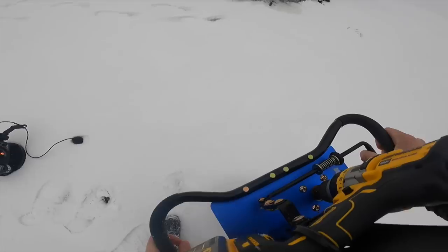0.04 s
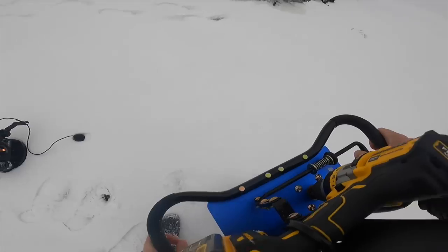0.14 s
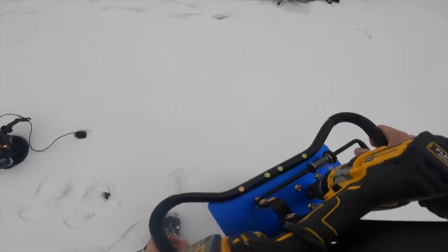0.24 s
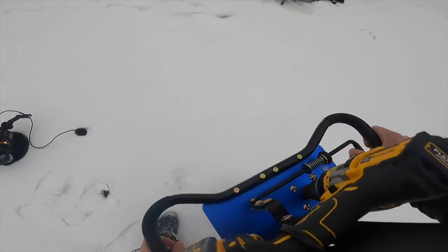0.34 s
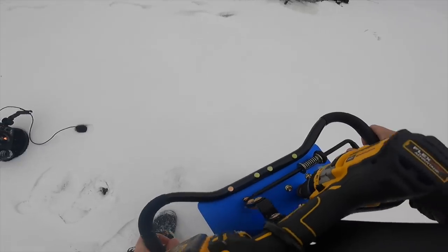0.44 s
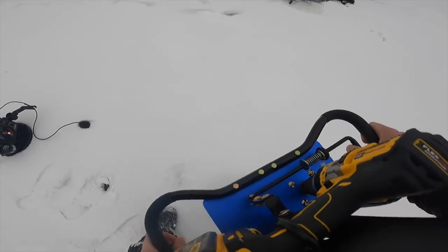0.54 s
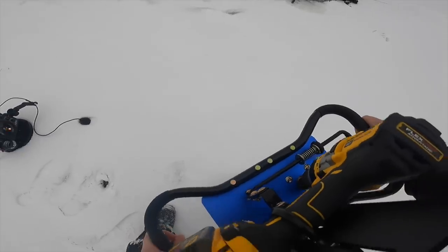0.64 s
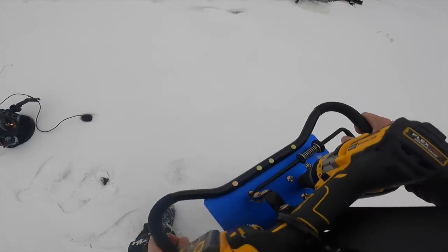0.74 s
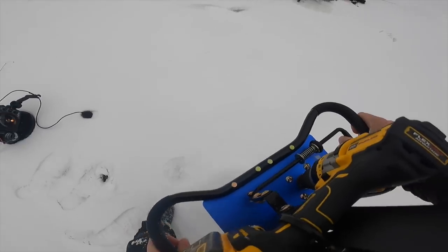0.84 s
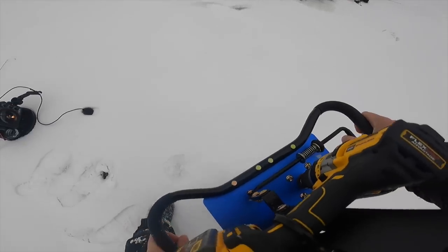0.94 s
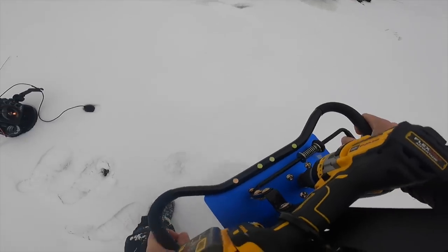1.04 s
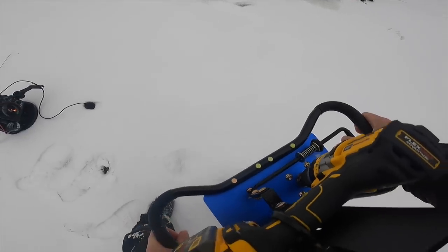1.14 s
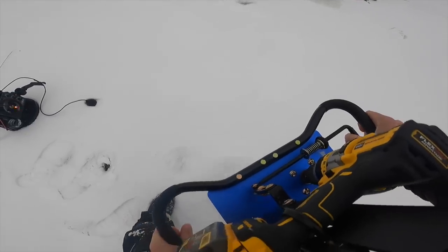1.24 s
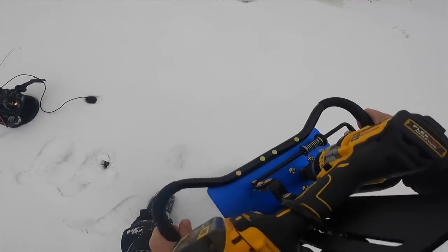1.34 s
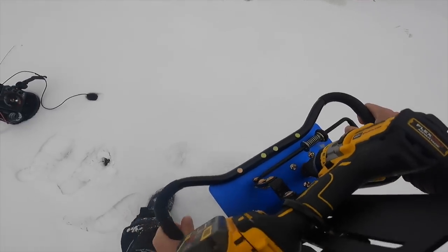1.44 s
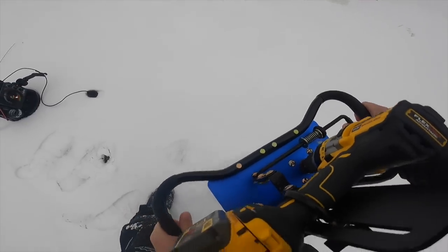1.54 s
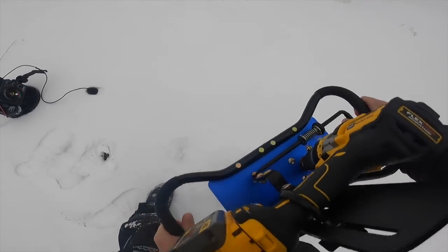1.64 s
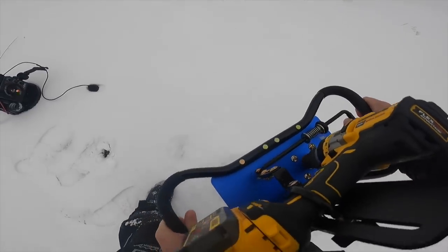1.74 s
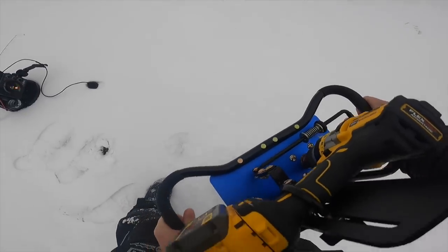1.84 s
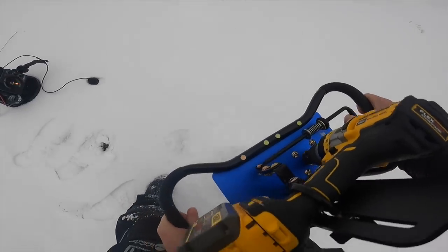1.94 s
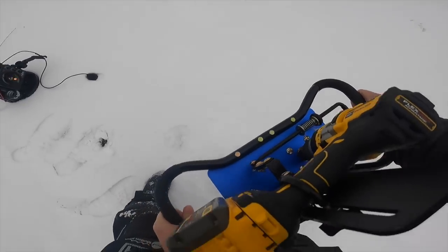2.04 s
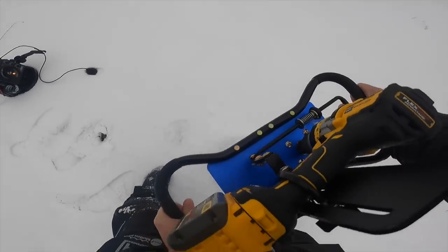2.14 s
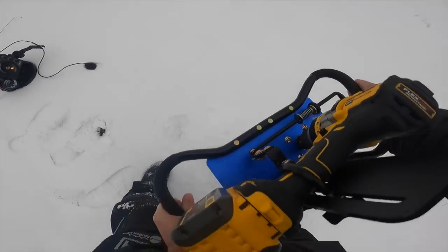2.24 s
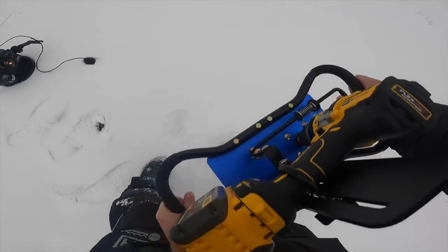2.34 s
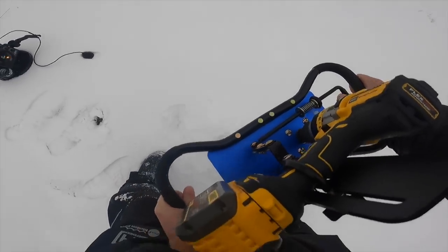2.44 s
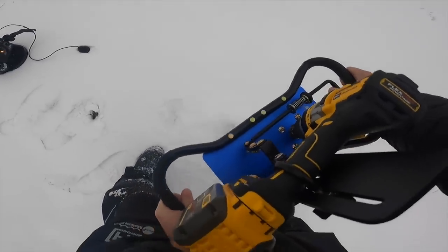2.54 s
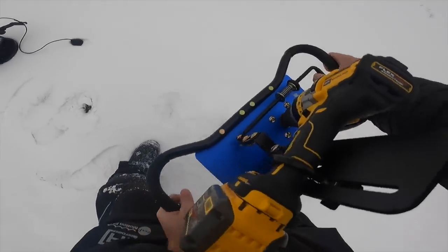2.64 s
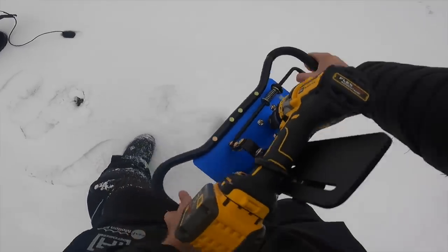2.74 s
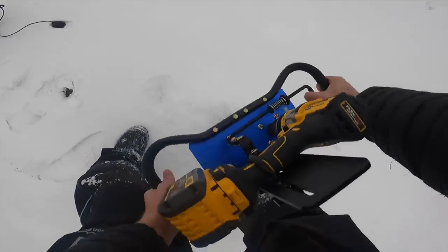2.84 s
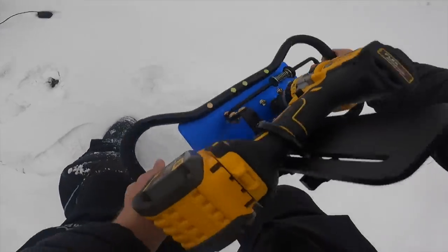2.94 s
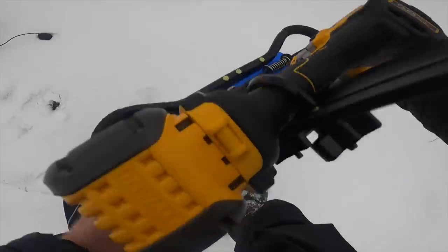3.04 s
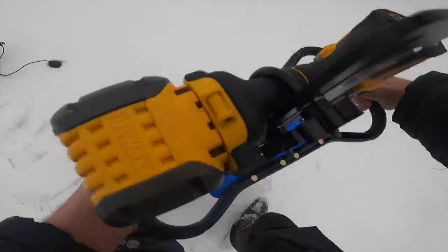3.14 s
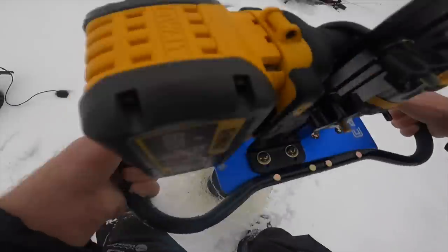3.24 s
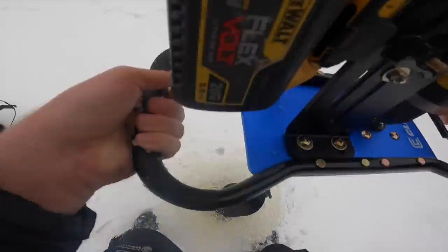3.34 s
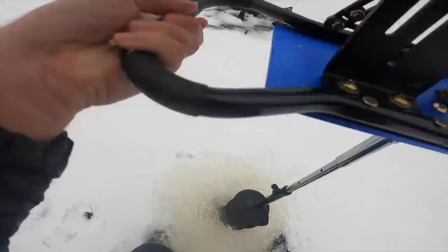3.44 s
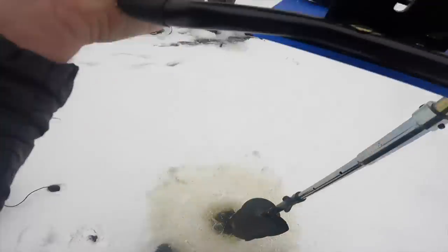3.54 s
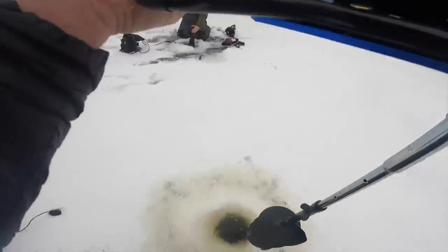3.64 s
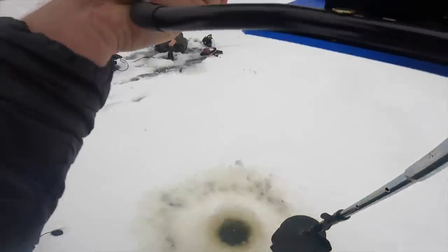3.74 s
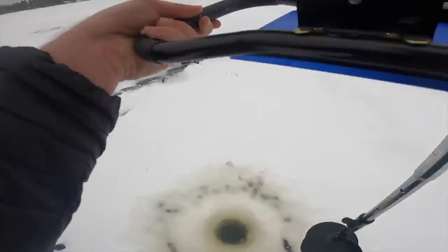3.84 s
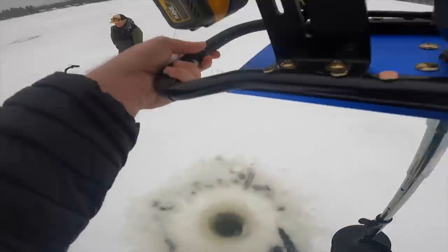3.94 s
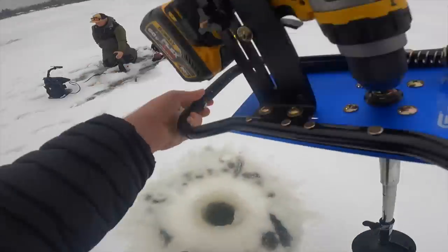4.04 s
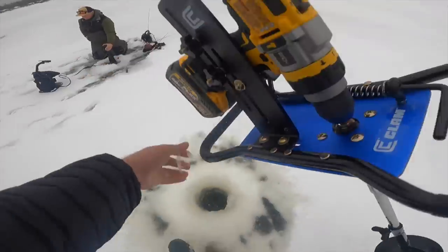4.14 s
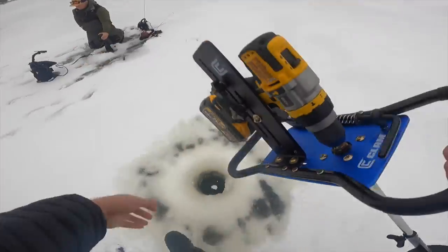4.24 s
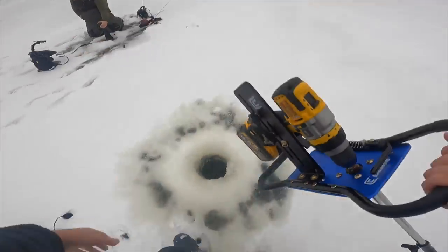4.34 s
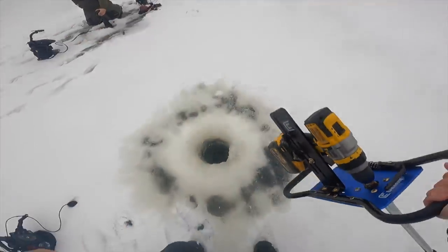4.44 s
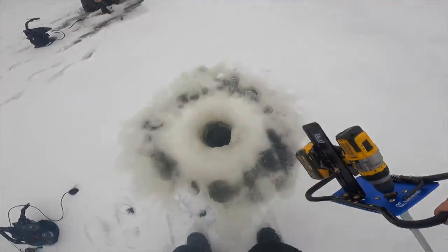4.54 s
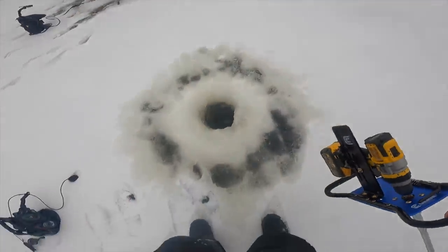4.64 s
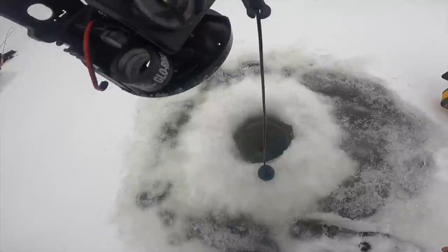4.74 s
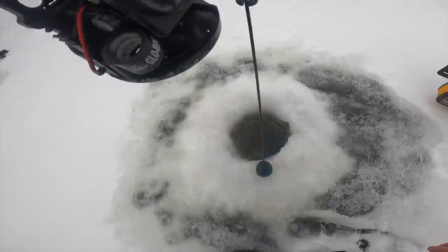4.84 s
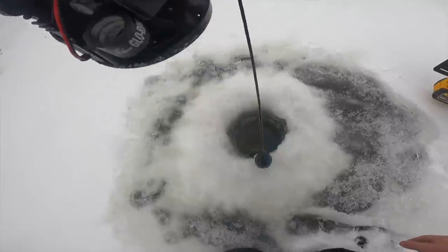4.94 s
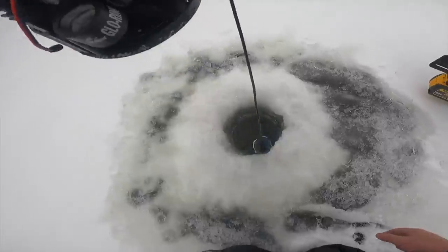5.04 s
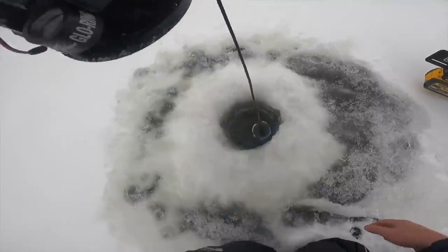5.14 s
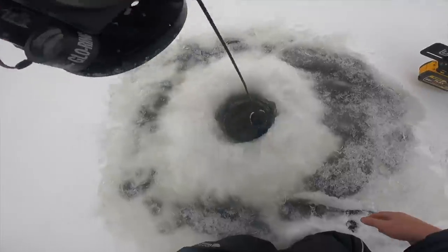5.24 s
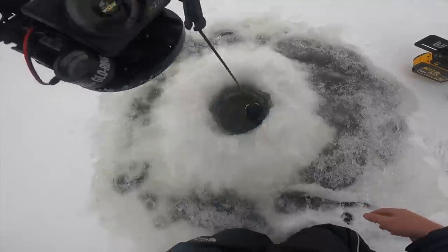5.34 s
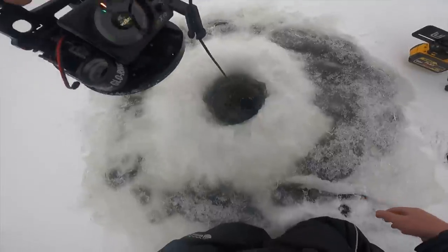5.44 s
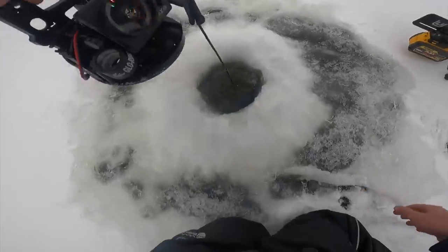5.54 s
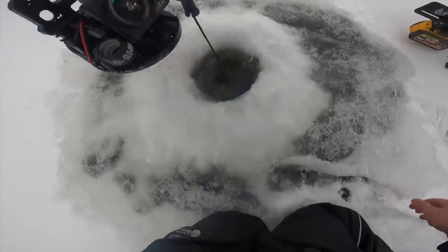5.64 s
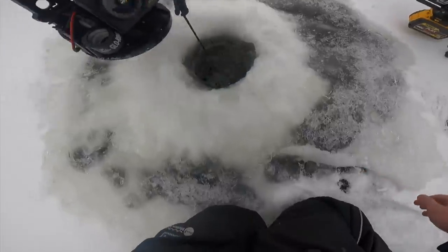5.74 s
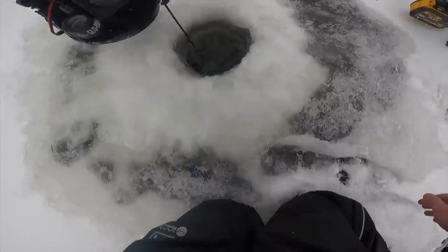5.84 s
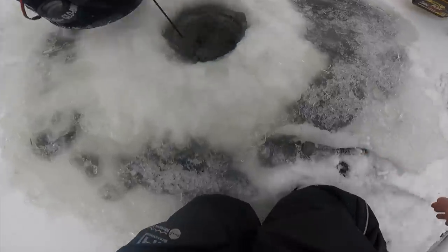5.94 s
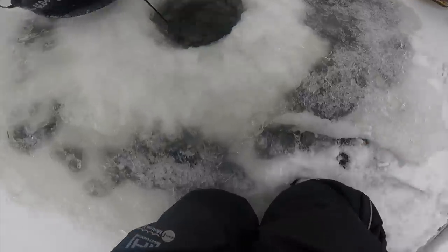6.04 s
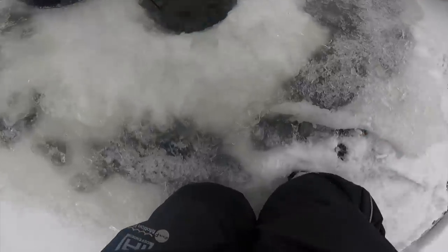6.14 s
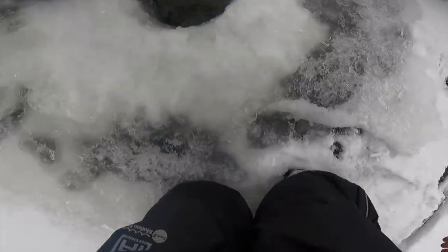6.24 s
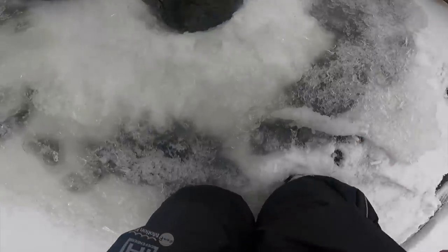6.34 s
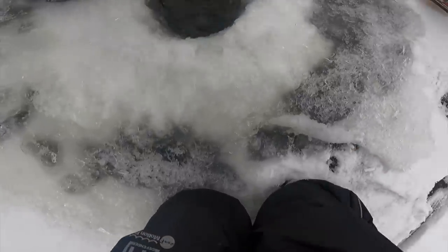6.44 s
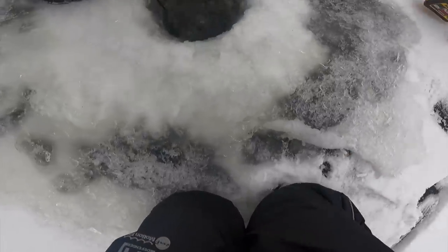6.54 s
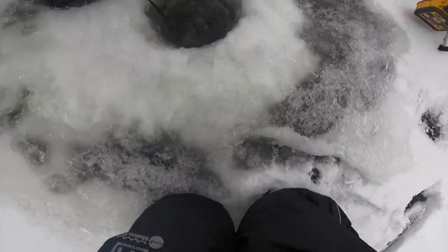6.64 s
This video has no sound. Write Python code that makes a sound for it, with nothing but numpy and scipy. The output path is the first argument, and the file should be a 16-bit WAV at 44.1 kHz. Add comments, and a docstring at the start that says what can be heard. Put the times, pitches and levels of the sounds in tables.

```python
"""Lake ice, light wind: a cordless drill turns an auger close by, as wavering gear orders over shaped noise.
It breaks through, races unloaded while the hole gulps in rough low tones, and stops with a falling whine.
Slush drains and crunches as noise, the frame is laid down with a clatter of decaying modes, the floor drops
abruptly, then a depth sounder's float plops in as rising tones, its transducer ticking and its display
motor humming."""
import sys
import numpy as np
from scipy import signal
from scipy.fft import rfft, irfft, next_fast_len
from scipy.io import wavfile
from scipy.ndimage import uniform_filter1d, map_coordinates

SR = 44100
rng = np.random.default_rng(int(sys.argv[2]) if len(sys.argv) > 2 else 0)


def dump(signal):
    """Clip the signal to [-1, 1] and save it as 16-bit WAV at the path in sys.argv[1]."""
    limited = np.clip(np.atleast_2d(signal).T, -1, 1)
    pcm = np.round(limited * 32767).astype(np.int16)
    wavfile.write(sys.argv[1], SR, pcm)


N = 295029
TIME = np.arange(N) / SR
HALF = np.array([[.5], [-.5]])  # splits a left-right difference over the two ports


def amp(db):
    """dB to gain."""
    return 10 ** (np.asarray(db) / 20)


def unit(x):
    """Scaled to rms 1."""
    return x / np.sqrt(np.mean(x ** 2) + 1e-20)


def along(points, hz):
    """(Hz, value) points interpolated on a log frequency axis."""
    f, v = np.transpose(points)
    return np.interp(np.log(hz + 1), np.log(f + 1), v)


def colour(points):
    """Gain of frequency from (Hz, dB) points."""
    return lambda hz: amp(along(points, hz))


def curves(rows):
    """One value per sample for each column after the time."""
    s, *cols = np.transpose(rows)
    return [np.interp(TIME, s, c) for c in cols]


def gate(rows):
    """1 while a table lasts, with a short fade outside it."""
    return np.clip(np.minimum(TIME - rows[0][0], rows[-1][0] - TIME) / 0.022 + 1, 0, 1)


def after(start_s, rise_s):
    """0 before start_s, 1 once rise_s has passed."""
    return np.clip((TIME - start_s) / rise_s, 0, 1)


def wobble(rate_hz):
    """A smooth random curve, rate_hz knots a second."""
    return map_coordinates(rng.standard_normal(int(N * rate_hz / SR) + 4), [TIME * rate_hz])


def filtered(x, response):
    """x times a complex response of frequency."""
    m = next_fast_len(N + SR // 2)
    return irfft(rfft(x, m) * response(np.fft.rfftfreq(m, 1 / SR)), m)[..., :N]


def rush(gain, alike, patchy_db, grit_db):
    """Stereo noise of rms 1, with patches of random gain and millisecond grit."""
    gritty = rng.standard_normal((2, N)) * amp(grit_db * wobble(500))
    z = signal.stft(gritty, nperseg=512)[2]
    field = uniform_filter1d(rng.standard_normal(z.shape[1:]), size=5, axis=0)
    field = uniform_filter1d(field, size=8, axis=1)
    pair = signal.istft(z * amp(patchy_db * unit(field)), nperseg=512)[1][:, :N]

    def mid_side(hz):
        turn = np.arccos(np.clip(along(alike, hz), -1, 1)) / 2
        return gain(hz) * [np.cos(turn), np.sin(turn)]

    mid, side = filtered(pair, mid_side)
    return unit(np.array([mid + side, mid - side]))


def burst(count, hz, thud_db, sharp):
    """Noise around a pitch over a dull thud."""
    f = np.fft.rfftfreq(count, 1 / SR) + 1
    snap_gain = 1 / (1 + (sharp * np.log(f / hz)) ** 2)
    thud_gain = 1 / (1 + (0.86 * np.log(f / 400)) ** 4)
    snap, thud = irfft(rfft(rng.standard_normal((2, count))) * [snap_gain, thud_gain], count)
    return unit(snap) + amp(thud_db) * unit(thud)


def slides(rows):
    """Each row rings at an exponentially sliding pitch and dies."""
    out, t = np.zeros(N + SR), np.arange(SR // 4) / SR
    for s, hz, rise, db, t60 in rows:
        rise_in = 1 - np.exp(-(t / (.001 + .35 / hz)) ** 2)
        phase = 2 * np.pi * np.cumsum(hz * np.exp(rise * np.minimum(t, t60))) / SR
        out[round(s * SR):][:len(t)] += amp(db - 60 * t / t60) * rise_in * np.sin(phase)
    return out[:N]


# Motor speed as tooth-mesh pitch, before shake. Each row: time in seconds, mesh in Hz.
MESH_HZ = [(0, 2440), (.55, 2360), (.72, 2420), (.92, 2350), (1.4, 2370), (1.7, 2310), (2.52, 2340),
           (2.66, 2100), (2.675, 1800), (2.7, 2120), (2.81, 2230), (2.86, 2900), (2.9, 2600), (2.96, 3030),
           (3.01, 3120), (3.04, 2960), (3.07, 3120), (3.19, 3050)]
# Gear orders. Each row: multiple of mesh, level in dB, waver in Hz in solid ice, change in dB when
# unloaded, extra lead of the left port in rad.
MESH_ORDERS = [(.615, 0, 24, 1, -.6), (1, 2, 30, -5, -.5), (2, 4, 70, -2, -.1), (3, -2, 140, -12, 0)]
# Fan and gearbox hiss spectrum. Each row: frequency in Hz, relative level in dB per Hz.
CASE_HISS_DB = [(1200, -24), (1600, -6.5), (2000, -12), (2450, -8), (2750, -9.5), (3600, -9.5), (3950, -2),
                (4700, -4), (5400, -4.5), (7200, -2), (9800, -10.5), (11000, -20.5), (12100, -17.5),
                (14300, -75), (14700, -60)]
# Auger frame resonances driven by the blades. Each row: frequency in Hz, width in Hz, level in dB.
SCRAPE_MODES = [(684, 167, 10), (1029, 230, 17), (1120, 61, -15), (1720, 100, -8)]
# Shaken ice spectrum. Each row: frequency in Hz, relative level in dB per Hz.
RUMBLE_SPECTRUM_DB = [(12, -46), (20, -16), (37, -13), (92, -2), (189, -3), (426, -17), (480, -38),
                      (620, -58), (1060, -120)]
# Likeness of the drill noise at the two ports. Each row: frequency in Hz, likeness 0-1.
ALIKE_DRILL = [(60, 0.96), (99, 1), (160, 0.98), (270, 1), (450, 0.95), (740, 1), (1220, 1), (2010, 0.85),
               (3330, 0.9), (5500, 0.93), (9080, 1), (15000, 0.56)]
# Phase between the ports. Each row: frequency in Hz, lead of the left port in rad.
PORT_LEAD_RAD = [(0, -0.083), (1810, 0.043), (2410, -0.86), (3880, -0.14), (10900, 0.23), (11700, 1),
                 (12300, -0.1), (15200, 0.0)]
# Level between the ports. Each row: frequency in Hz, left minus right in dB.
PORT_LEAN_DB = [(60, -2.5), (110, -0.5), (200, -1.5), (380, -2), (700, -4), (1290, -1), (2380, -5),
                (4400, -3.5), (8120, -1.0), (15000, 4)]
# Level change while breaking through. Columns: whine, hiss, scrape, rumble, in dB.
BREAK_CHANGE_DB = (-1, -0.2, -0.5, 4.5)
# Level change running free. Columns: whine, hiss, scrape, rumble, in dB.
FREE_CHANGE_DB = (0, 0, -5, 2)
# Brief drop as the auger jerks free. Columns: whine, hiss, scrape, rumble, in dB.
JERK_DROP_DB = (-9, -6, -13, -8)
# Slope after the trigger is let go. Columns: whine, hiss, scrape, rumble, in dB per second.
COAST_SLOPE_DB_PER_S = (-600, -53, -100, -95)
BREAK_S, FREE_S, RELEASE_S = 2.55, 2.835, 3.185  # blades break through, auger jerks free, trigger let go
JERK_HALF_WIDTH_S = 0.016
SOLID_ICE_DB = (-31, -22, -24, -30)  # whine, hiss, scrape, rumble
UNEVEN, UNEVEN_BREAKING = .013, .05  # speed shake as a share of speed
SMEAR_BREAKING = 3  # order waver multiplier while breaking through


def drill():
    """Wavering gear orders over fan hiss; the blades scrape through the frame's resonances and shake the ice."""
    loose = after(FREE_S, 0.019)
    breaking = after(BREAK_S, .03) - loose
    jerk = np.exp(-((TIME - FREE_S) / JERK_HALF_WIDTH_S) ** 2)
    coast_s = np.maximum(TIME - RELEASE_S, 0)
    columns = zip(SOLID_ICE_DB, BREAK_CHANGE_DB, FREE_CHANGE_DB, JERK_DROP_DB, COAST_SLOPE_DB_PER_S)
    whine_db, hiss_db, scrape_db, rumble_db = (
        db + breaking * b + loose * f + jerk * j + coast_s * c for db, b, f, j, c in columns)

    # load shakes the speed; the balance of orders shifts with speed
    shake = (UNEVEN + (UNEVEN_BREAKING - UNEVEN) * breaking) * wobble(40)
    mesh_hz = curves(MESH_HZ)[0] * (1 + shake)
    unloaded = np.clip((mesh_hz - 2500) / 500, 0, 1)
    smear = 1 + (SMEAR_BREAKING - 1) * breaking
    whine = 0
    for k, db, waver_hz, unloaded_db, lead_rad in MESH_ORDERS:
        order_amp = amp(db + unloaded * unloaded_db + 3.1 * wobble(50))
        order_hz = k * mesh_hz + waver_hz * smear * wobble(180)
        whine = whine + order_amp * np.sin(2 * np.pi * np.cumsum(order_hz) / SR + HALF * lead_rad)

    def frame(f):
        modes = sum(amp(db) * 1j * f * w / (c * c - f * f + 1j * f * w) for c, w, db in SCRAPE_MODES)
        return np.abs(modes) / (1 + (f / 14500) ** 24)

    noise = amp(hiss_db) * rush(colour(CASE_HISS_DB), ALIKE_DRILL, patchy_db=1.62, grit_db=0.82)
    noise += amp(scrape_db) * rush(frame, ALIKE_DRILL, patchy_db=1.3, grit_db=0.84)
    noise += amp(rumble_db) * rush(colour(RUMBLE_SPECTRUM_DB), ALIKE_DRILL, patchy_db=2.0, grit_db=2.0)

    def off_to_one_side(f):
        return amp(HALF * along(PORT_LEAN_DB, f)) * np.exp(1j * HALF * along(PORT_LEAD_RAD, f))

    return filtered(noise + amp(whine_db) * whine, off_to_one_side)


# Surges in the flooding hole's air column. Each row: start in seconds, length in seconds, first pitch
# in Hz, last pitch in Hz, level in dB, roughness 0-1.
GULP_SURGES = [(2.559, .12, 160.1, 154.8, -23.5, .45), (2.699, 0.1, 149.6, 167.7, -28, 0.56),
               (2.861, 0.019, 171.7, 178, -25, 0.87), (2.888, 0.052, 210.5, 160.2, -14.5, 0.43),
               (2.969, 0.013, 228.8, 249.4, -19.5, 0.75), (3.027, 0.0498, 220.5, 189.4, -19.5, 0.44),
               (3.104, .1, 279.7, 215.6, -13, .35), (3.21, 0.11, 250, 330, -12.5, 0.64),
               (3.337, 0.027, 339.3, 327, -13, 0.59), (3.475, 0.034, 303.4, 300, -32.5, 0.46)]
GULP_ATTACK_S, GULP_T60_S = 0.0041, 0.058


def gulps():
    """Surging water drives the hole's air column: a low tone with overtones, torn and splashing when rough."""
    points, level = [], 0
    for s, length_s, first_hz, last_hz, db, r in GULP_SURGES:
        points += [(s, first_hz, r), (s + length_s, last_hz, r)]
        fall_db = 60 * np.maximum(TIME - s - length_s, 0) / GULP_T60_S
        level = level + after(s, GULP_ATTACK_S) * amp(db - fall_db)
    hz, rough = curves(points)
    rough = np.clip(rough, 0, 1)
    phase = 2 * np.pi * np.cumsum(hz * (1 + .22 * rough * wobble(90))) / SR
    tone = np.sin(phase)
    tone += 0.14 * np.sin(2 * phase + 1.6 * wobble(60))
    tone += 0.21 * np.sin(3 * phase + 2.7 * wobble(60))
    torn_tone = unit(tone) * amp(4.9 * rough * (wobble(70) - 1.44))
    splash_colour = colour([(60, -11), (150, -2), (420, 1.5), (630, 2), (780, -12.5), (1400, -25), (3000, -59)])
    splash = rush(splash_colour, [(300, 0.97)], patchy_db=4.0, grit_db=4)
    return level * (torn_tone + 0.86 * rough * splash)


# Single snaps of ice, slush and metal. Each row: start in seconds, level in dB, centre in Hz,
# thud in dB re the snap.
SNAPS = [(2.8473, -9, 5700, -18), (3.026, -16, 1810, 6), (3.1043, -14, 6300, 3), (3.3422, -16, 4480, 3),
         (3.4665, -18, 7330, -12), (3.493, -11.5, 7740, -39), (3.558, -14.5, 4960, -33),
         (3.591, -20, 2170, -28), (3.6576, -22, 1540, -37), (3.8532, -17, 6940, -32),
         (3.8994, -22, 2160, -34), (4.0906, -30, 4400, -30), (4.3795, -17.5, 6800, -9),
         (4.4119, -26.5, 4900, -6), (4.7289, -27.5, 1520, 3), (4.782, -30, 5900, 8), (4.8676, -22, 6060, 2),
         (4.897, -22, 6950, -22), (4.9367, -18.5, 1720, -25), (4.947, -17, 2750, -24), (5.078, -34, 500, 7),
         (5.1324, -33.5, 1850, 5), (5.426, -19.5, 3270, -12), (5.454, -20, 8950, -23),
         (5.5712, -30, 7870, -14), (5.5853, -24, 2730, -5), (5.6012, -12, 4250, 2), (5.646, -17, 2400, -3),
         (5.7324, -31, 3300, -23), (5.77, -10.5, 9200, -37), (5.9738, -28, 1480, 8),
         (6.0533, -27, 7140, -6), (6.0962, -27, 2900, -23), (6.1963, -17, 4500, -28),
         (6.217, -20, 5520, -23), (6.4515, -27.5, 3560, -19), (6.555, -28.5, 4810, -6)]
# Crunches of dense grit. Each row: start in seconds, end in seconds, level in dB, centre in Hz,
# thud in dB re the crunch.
GRIT_CRUNCHES = [(3.585, 3.79, -29.5, 1470, -37), (4.302, 4.354, -43.5, 2000, -16),
                 (4.378, 4.393, -23.5, 4480, -11), (4.737, 4.845, -37.5, 6500, -19),
                 (4.866, 4.901, -22.5, 3760, -3), (4.904, 4.931, -36, 2000, -12),
                 (4.932, 4.962, -30, 2500, -18), (5.003, 5.029, -39, 2500, -10),
                 (5.459, 5.478, -24, 7500, -26), (5.577, 5.613, -40, 3500, -10),
                 (5.625, 5.674, -34, 2960, 1), (5.811, 5.835, -34, 6000, -1),
                 (6.139, 6.175, -22.5, 4930, -9), (6.166, 6.29, -32, 5700, -11)]
# Steel frame modes. Each row: frequency in Hz, level in dB, t60 in seconds.
FRAME_MODES = [(990, 7, 0.072), (2500, -11, 0.033), (3500, -10, 0.039), (4800, 2, 0.033), (6180, 4, 0.035),
               (7000, -2, 0.095)]
# Blows on the frame. Each row: start in seconds, level in dB, boost of the lowest mode in dB.
BLOWS = [(4.382, -26.5, -15), (4.868, -28, -8), (4.896, -27.5, -7), (4.942, -41.5, 15), (5.009, -47.5, 17)]
# Treble loss of these close sounds. Each row: frequency in Hz, gain in dB.
PORT_LOSS_DB = [(8000, 1), (10000, -4), (12000, -19), (14000, -18), (15600, -40)]
SNAP_T60_S = 0.0093


def knocks():
    """Snaps ring briefly and die, crunches swell and fade in grains, blows ring the steel frame."""
    out, t = np.zeros(N + SR), np.arange(SR // 5) / SR
    for s, db, hz, thud_db in SNAPS:
        fade = amp(-60 * t / SNAP_T60_S) * (1 - np.exp(-t / 0.00014))
        ring = 0.55 * fade ** 0.46 * np.sin(2 * np.pi * hz * t)
        snap = fade * burst(len(t), hz, thud_db, sharp=1.2) + ring
        out[round(s * SR):][:len(t)] += amp(db) * snap
    grit = unit(amp(3.5 * wobble(400)))
    for start_s, end_s, db, hz, thud_db in GRIT_CRUNCHES:
        swell = np.sin(np.pi * np.clip(t / (end_s - start_s), 0, 1) ** 0.58) ** 0.62
        i = round(start_s * SR)
        crunch = np.nan_to_num(swell) * grit[i:][:len(t)] * burst(len(t), hz, thud_db, sharp=1.21)
        out[i:][:len(t)] += amp(db) * crunch
    for s, db, low_db in BLOWS:
        for mode, (hz, mode_db, t60) in enumerate(FRAME_MODES):
            boost_db = low_db if mode == 0 else 0
            level_db = db + mode_db + boost_db + rng.normal(0, 2.4)
            out[round(s * SR):][:len(t)] += amp(level_db - 60 * t / t60) * np.sin(2 * np.pi * hz * t)
    return filtered(out[:N], colour(PORT_LOSS_DB))


def scatter(x):
    """Body, gear and ice close by send each port its own brief reflections."""
    t = np.arange(SR // 40) / SR
    tails = rng.standard_normal((2, len(t))) * amp(-60 * t / .012)
    tails = tails / np.linalg.norm(tails[0])
    return x + amp(-14) * signal.fftconvolve(x[None], tails, axes=1)[:, :N]


# Trickle and fizz levels: draining slush, then, after an abrupt drop at 5.22 s, a quieter floor that
# swells again. Each row: time in seconds, trickle in dB, fizz in dB.
TRICKLE_FIZZ_DB = [(3.3, -32, -39), (3.43, -29, -35), (3.67, -37.5, -29), (4.06, -51, -43.5),
                   (4.6, -50.5, -50.5), (4.75, -44, -47.5), (4.9, -38.5, -43.5), (5.22, -43.5, -44),
                   (5.23, -57, -56.5), (5.41, -53.5, -53.5), (5.52, -50.5, -42.5), (5.65, -34, -42.5),
                   (5.74, -44, -46.5), (6.15, -42, -41), (6.38, -46.5, -47.5), (6.69, -45, -41.5)]
# Trickle spectrum. Each row: frequency in Hz, relative level in dB per Hz.
TRICKLE_SPECTRUM_DB = [(88, -43), (150, -4), (306, -4.5), (489, -10.5), (584, -0.5), (708, -5.5),
                       (1060, 0.5), (4000, -23.5), (5200, -38), (8800, -120)]
# Wet snow spectrum. Each row: frequency in Hz, relative level in dB per Hz.
FIZZ_SPECTRUM_DB = [(1180, -10.5), (2000, -2), (2370, -6.5), (2590, -5), (4560, -5), (7560, -5),
                    (12500, -21), (14000, -32), (15500, -50)]
# Wind rumble level; it drops abruptly at 5.22 s. Each row: time in seconds, level in dB.
WIND_DB = [(3.3, -37), (3.67, -51), (4.25, -53), (5.06, -38), (5.22, -38), (5.23, -58), (5.55, -48.5),
           (6.1, -44.5), (6.34, -50), (6.69, -41.5)]
# Wind rumble spectrum. Each row: frequency in Hz, relative level in dB per Hz.
WIND_SPECTRUM_DB = [(8.8, -33), (15, 0.5), (86, -5.5), (204, -15.5), (231, -13.5), (269, -7), (400, -13.5),
                    (520, -14), (880, -120)]
# Likeness of these noises at the two ports. Each row: frequency in Hz, likeness 0-1.
ALIKE_SLUSH = [(60, 0.83), (180, 0.97), (550, 0.87), (1650, 0.51), (4970, 0.86), (15000, 0.87)]


def slush():
    """Water trickles and wet snow fizzes in grains; wind rumbles on the ports."""
    trickle_db, fizz_db = curves(TRICKLE_FIZZ_DB)
    trickle = rush(colour(TRICKLE_SPECTRUM_DB), ALIKE_SLUSH, patchy_db=2, grit_db=3.0)
    fizz = rush(colour(FIZZ_SPECTRUM_DB), ALIKE_SLUSH, patchy_db=2.5, grit_db=1)
    wind_db = curves(WIND_DB)[0] + 2.5 * wobble(10)
    wind = rush(colour(WIND_SPECTRUM_DB), ALIKE_SLUSH, patchy_db=2, grit_db=3.0)
    wet = amp(trickle_db + 0.62 * wobble(11)) * trickle + amp(fizz_db) * fizz
    return gate(TRICKLE_FIZZ_DB) * (wet + amp(wind_db) * wind)


# Falling tones. Each row: start in seconds, first pitch in Hz, log pitch slope per second,
# level in dB, t60 in seconds.
RUN_DOWN_TONES = [(3.28, 4970, -1.2, -36, .5), (3.4, 4150, -4, -30, .22)]


def run_down():
    """The braked motor's whine falls in pitch and dies, its level fluttering."""
    return slides(RUN_DOWN_TONES) * amp(7.4 * wobble(120))


# Ticks, loud while the transducer hangs near. Each row: time in seconds, level in dB.
PINGS_DB = [(5.21, -37), (5.4, -41.5), (5.47, -27), (5.56, -23), (5.7, -48), (6.69, -41)]
# Display motor hum. Each row: time in seconds, level in dB.
HUM_DB = [(5.25, -53), (5.3, -51.5), (5.55, -54), (5.66, -32), (5.74, -52.5), (6.3, -50), (6.5, -58),
          (6.69, -45)]
PING_S, PING_HZ = 5.2193, 47.8  # first tick, tick rate


def sounder():
    """The transducer ticks once a turn of the display motor, which hums."""
    since_s = (TIME - PING_S) % (1 / PING_HZ)
    tick_colour = colour([(1500, -40), (3000, -0.5), (7000, 5), (11000, 0), (14000, -41)])
    tick = unit(filtered(rng.standard_normal(N), tick_colour))
    ticks = amp(curves(PINGS_DB)[0] - 60 * since_s / 0.0073) * tick * (TIME > PING_S)
    hum = np.sqrt(2) * np.sin(2 * np.pi * np.cumsum(152 + 9 * wobble(40)) / SR)
    return ticks + gate(HUM_DB) * amp(curves(HUM_DB)[0] + 2.5 * wobble(15)) * hum


# Air pockets closing under the float, and droplets. Each row: start in seconds, first pitch in Hz,
# log pitch slope per second, level in dB, t60 in seconds.
PLOP_BUBBLES = [(5.601, 139, 8, -2.5, 0.12), (5.614, 500, 34, -23, 0.043), (5.617, 4260, 1.5, -12, 0.015),
                (5.632, 420, 24, -18, 0.11), (5.648, 695, 20, -17.5, 0.045), (5.662, 1080, 10, -14, 0.021),
                (5.772, 3700, 1.5, -21, .016), (5.817, 260, 9.6, -21.5, 0.05)]


def bubbles():
    """A closing air pocket rings at a rising pitch and radiates no deep bass."""
    return filtered(slides(PLOP_BUBBLES), lambda hz: 1 / (1 + (110 / (hz + 1)) ** 6))


# Swing of the near sounds. Each row: time in seconds, left minus right in dB.
PAN_DB = [(3.3, -2), (3.97, 1), (5.02, -2), (5.17, 3), (5.74, 0), (6.17, 3), (6.69, 0.5)]


def scene():
    """Near sounds swing left and right as the wearer of the microphones turns; the drill keeps its side."""
    near = gulps() + scatter(knocks()) + run_down() + slush() + sounder() + bubbles()
    return drill() + near * amp(HALF * curves(PAN_DB)[0])


CEILING, KNEE = .75, 4  # soft-limit amplitude, sharpness of its bend
TOP_HZ = 15692


def record(dry):
    """The camera softens the highest peaks and keeps nothing above its band limit."""
    softened = dry / (1 + np.abs(dry / CEILING) ** KNEE) ** (1 / KNEE)
    return filtered(softened, lambda hz: hz < TOP_HZ)


dry = scene()
out = record(dry)
dump(out)
```